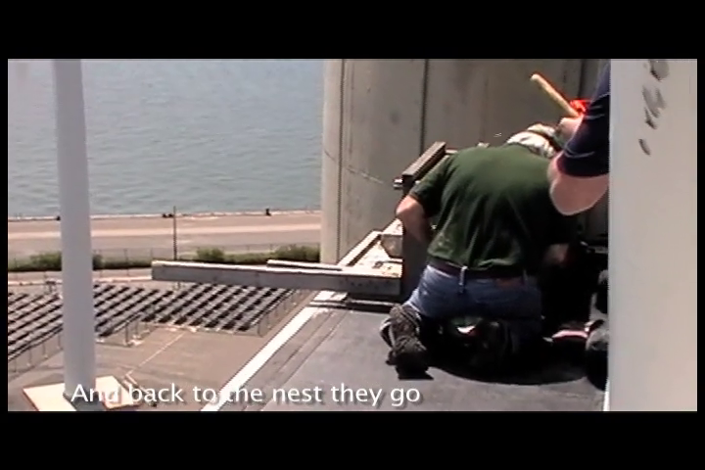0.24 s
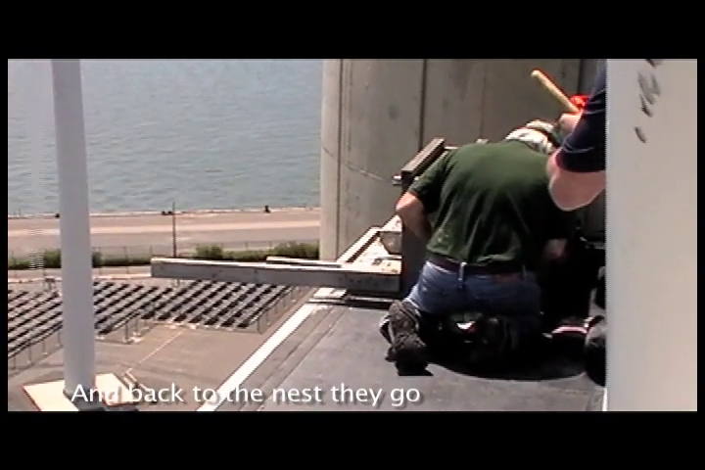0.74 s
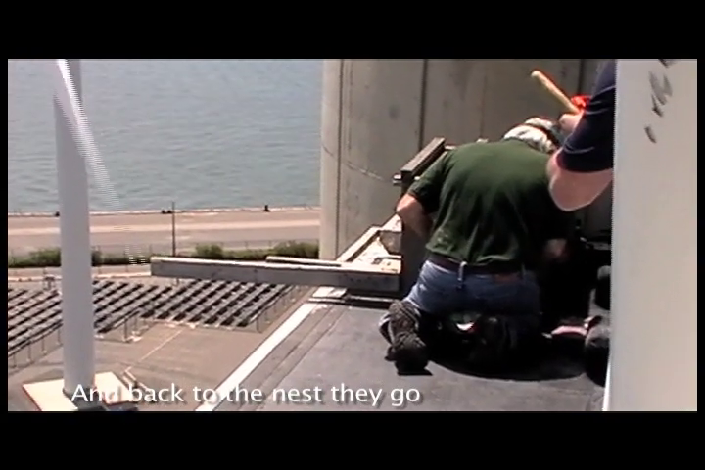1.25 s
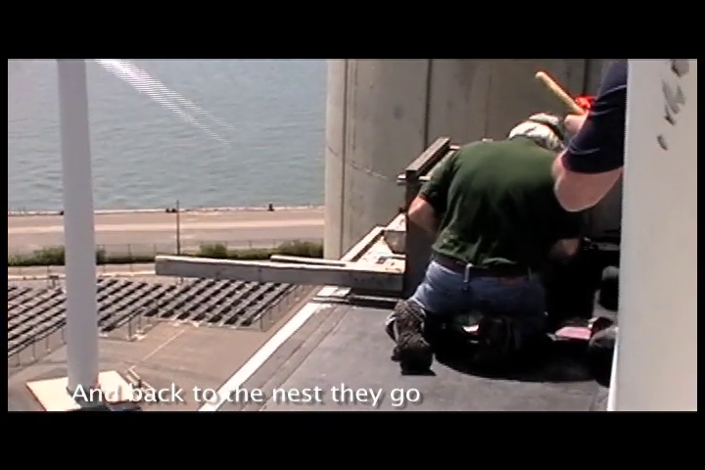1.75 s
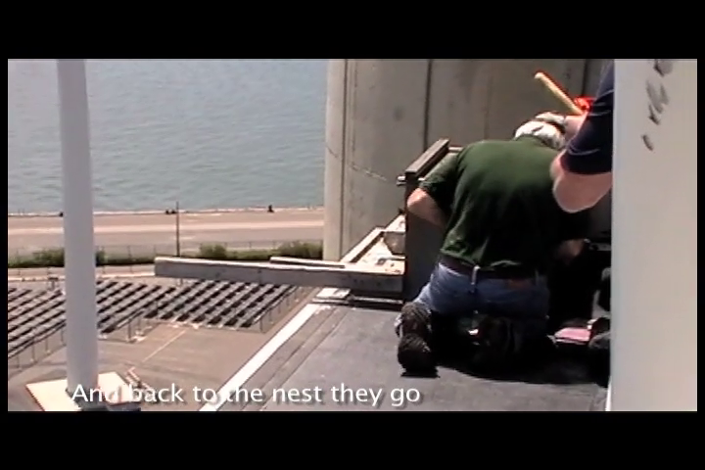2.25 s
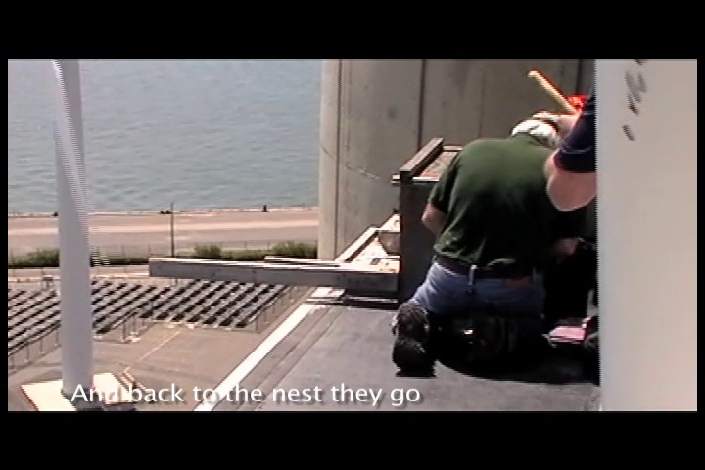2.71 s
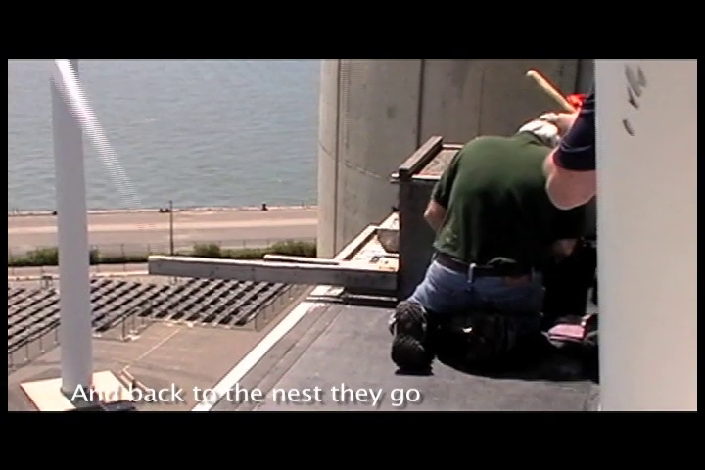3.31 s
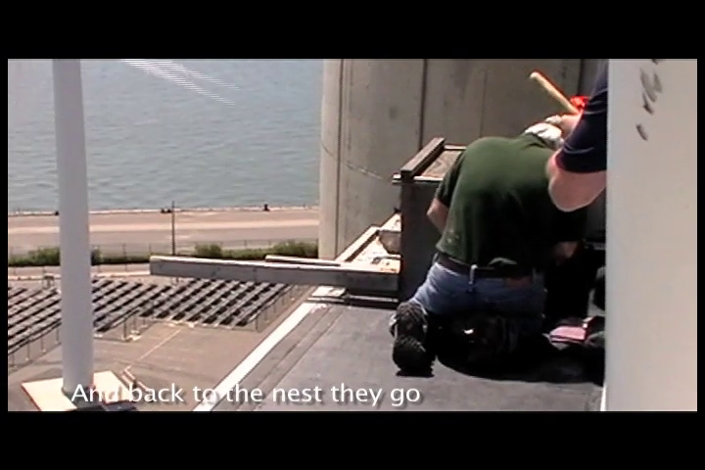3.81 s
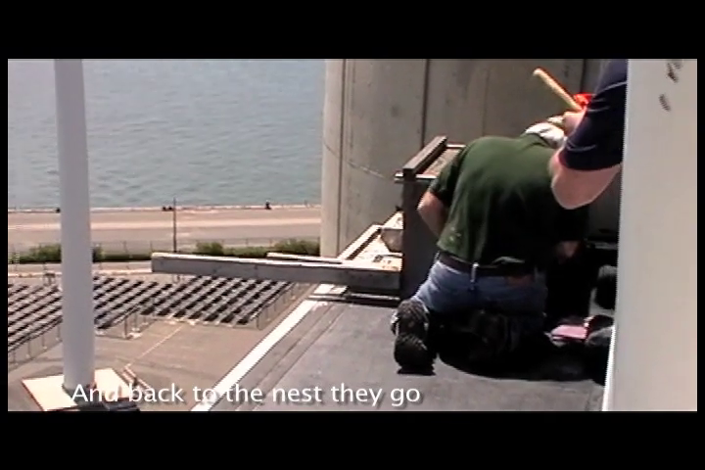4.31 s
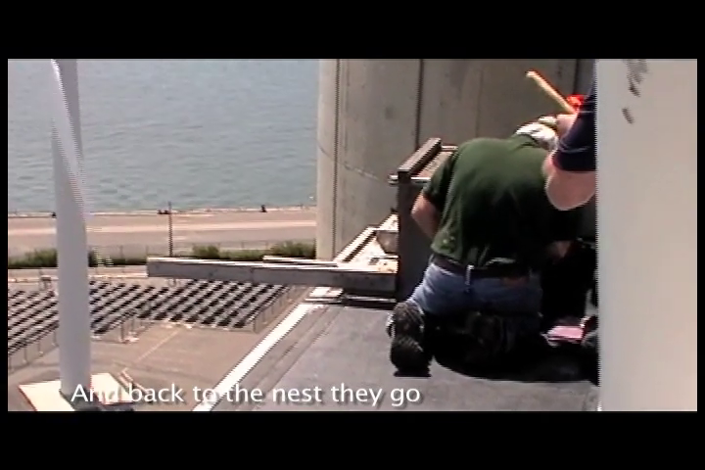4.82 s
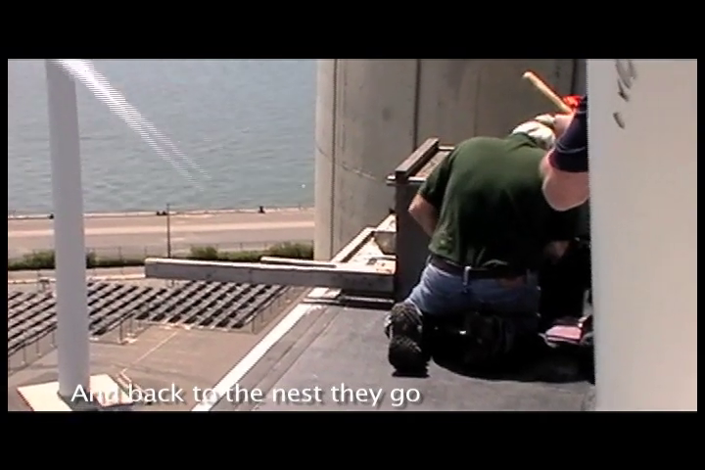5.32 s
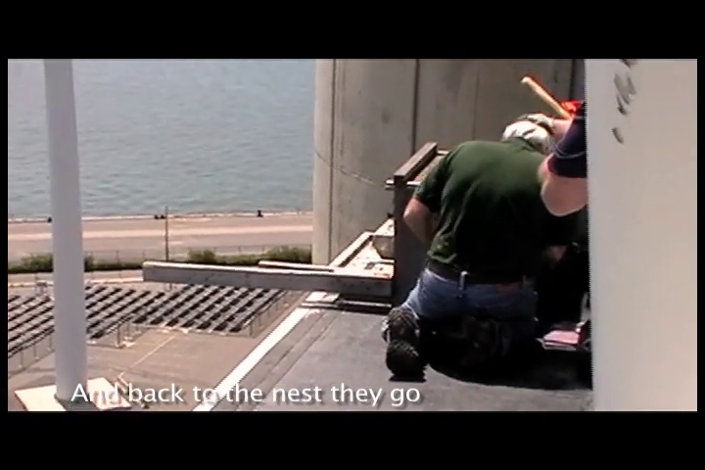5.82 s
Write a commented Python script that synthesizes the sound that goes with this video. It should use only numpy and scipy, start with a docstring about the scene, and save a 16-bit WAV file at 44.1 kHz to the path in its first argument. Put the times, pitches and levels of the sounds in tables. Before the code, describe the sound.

A falcon scolds in rapid, harsh kaks while a second squawks and wails, with wind rumbling on the microphone.

```python
"""From the first moment wind buffets the microphone over a faint town wash, and a peregrine falcon
scolds from a rooftop: even, harsh kaks, membrane pulses ringing through its windpipe. A second
falcon squawks in between, and close concrete walls answer both. Just before the one-second mark
a brief low hoot sounds far off. Then the kaks grow hoarser and the squawks stretch into wails."""
import sys
import numpy as np
from scipy import signal
from scipy.fft import rfft, irfft, next_fast_len
from scipy.io import wavfile
from scipy.ndimage import uniform_filter1d, map_coordinates

SR = 44100
rng = np.random.default_rng(int(sys.argv[2]) if len(sys.argv) > 2 else 0)


def generate_wav(signal):
    """Clip the signal to [-1, 1] and save it as 16-bit WAV at the path in sys.argv[1]."""
    frames = np.transpose(np.atleast_2d(signal))
    scaled = np.clip(frames, -1, 1) * 32767
    pcm = np.round(scaled).astype(np.int16)
    wavfile.write(sys.argv[1], SR, pcm)


N = 266948

# tone of the distant town: freq_hz, level_db
TOWN_SPECTRUM = [(200, -2), (1000, -2), (2500, -16), (5000, -20), (9000, -35.5), (15000, -56)]
# path of the hoot: time_s, pitch_hz, level_db
HOOT_PATH = [(.82, 635, -54), (.845, 623, -29), (.875, 590, -23), (.905, 618, -36), (.935, 700, -32),
             (.965, 746, -37)]
# fader ride of the wind: time_s, level_db
WIND_RIDE = [(0.0, -20.5), (0.13, -12), (0.2, -18.5), (0.64, -14), (0.66, -18), (1.38, -15.5), (1.55, -14),
             (1.63, -15.5), (3.42, -15.5), (3.52, -18.5), (3.89, -12.5), (3.94, -16.5), (4.15, -14),
             (4.41, -17), (4.45, -14), (5.06, -18.5), (5.07, -22.5), (5.26, -16), (5.39, -26),
             (5.44, -12.5), (5.83, -20), (6.05, -21)]
# tone of the wind's low rumble: freq_hz, level_db
RUMBLE_SPECTRUM = [(15, -26), (28, -19), (48, -5.5), (80, 0), (130, 1.5), (190, -1.5), (260, -7.5),
                   (400, -21.5), (800, -49), (4000, -110)]
# tone of the wind's flutter: freq_hz, level_db
FLUTTER_SPECTRUM = [(100, -48), (200, -2), (280, -0.5), (400, -4), (600, -11), (900, -20), (1500, -27.5),
                    (3000, -40), (6000, -66), (12000, -78)]
# hardest hits of wind: time_s, gain_db, puff_relative_db
WIND_HITS = [(.125, -0.5, -9), (.412, -6.5, -9), (0.549, -3.5, -8), (.565, -4, -6), (0.631, -5.5, -23),
             (.695, -9, -5), (.763, -1, -12), (1.529, 3, -10.5), (1.563, -2, -19), (1.829, -5.5, -3.5),
             (1.965, -5, -4.5), (2.015, -7.5, -6.5), (2.043, -10, -15), (2.583, -7, -0.5),
             (2.768, -13, -22), (2.954, -1.5, -10), (3.255, -4, -6.5), (3.586, -11.5, -1), (3.87, -6, -16),
             (4.12, -2, -13), (4.151, -2.5, -22), (4.312, -6, -13), (4.435, -5.5, -7.5), (4.462, -4.5, -10),
             (4.545, -0.5, -10.5), (4.699, -2, -10), (4.73, -2, -9.5), (4.804, -7, -19), (4.875, -4, -7),
             (5.453, -2.5, -11), (5.66, -6.5, -5), (5.849, -7, -26), (5.965, -9, -5.5)]
# decay of the echo off the concrete: freq_hz, t60_s
WALL_DECAY = [(300, 0.22), (2200, 0.16), (6000, 0.14), (12000, 0.089)]
# throat resonances of the second falcon: freq_hz, gain_db
THROAT_EQ = [(600, -41), (1080, -3.5), (1350, -11), (1750, -1.5), (2450, 4.5), (2900, 2), (3500, -6.5),
             (4300, -6), (5100, -11), (6200, -8), (7500, -13), (9500, -19), (12000, -34.5), (15800, -43)]
# the second falcon's cries: start_s, length_s, top_pitch_hz, top_at_share, pitch_fall_share,
# level_db, accent_at_share, roughness_share, brightness_db
CRY_CUES = [(0, 0.058, 1467, 0.33, 0.23, -21, 0.01, 0.39, 3.5),
            (0.271, 0.049, 1214, 0.1, 0.1, -27, 0.15, 0.7, 1),
            (0.553, 0.052, 1450, 0.18, 0.26, -26.5, 0.5, 0.24, 12.5),
            (0.917, 0.052, 1286, 0.4, 0.041, -27.5, 0.2, .8, 5),
            (0.996, 0.055, 1294, 0.39, 0.062, -27.5, 0.32, 0.4, 8.5),
            (1.348, .075, 1514, 0.17, .085, -25, 0.2, 0.2, 2.5),
            (1.466, 0.055, 1403, 0.38, 0.072, -24.5, 0.54, .55, 3),
            (1.774, 0.056, 1430, .55, 0.016, -20, 0.37, 0.18, 1.5),
            (1.847, 0.081, 1413, 0.3, 0.031, -25, .38, 0.28, 0.5),
            (2.115, 0.077, 1365, 0, 0.053, -25, 0.36, 0.45, -3),
            (2.203, 0.074, 1267, 0, 0.068, -24, 0.37, 0.37, -2),
            (2.508, 0.089, 1360, 0.66, 0.043, -25.5, 0.58, 0.38, -3),
            (2.609, .11, 1335, 0, 0.12, -24, 0.38, 0.28, -1),
            (2.91, .13, 1328, 0.4, 0.0084, -25, 0.51, 0.2, -7.5),
            (3.084, .072, 1247, 0, 0.043, -24, 0.52, 0.36, -4),
            (3.339, 0.097, 1318, 0.6, .01, -37.5, .4, 0.42, -5),
            (3.46, 0.2, 1285, 0.08, 0.12, -22, 0.69, 0.36, 1),
            (3.992, 0.19, 1226, .18, 0.067, -24, 0.33, 0.14, -1),
            (4.487, 0.12, 1230, 0.33, 0.054, -35, 0.63, 0.28, -4),
            (4.725, 0.091, 1133, 0.67, .01, -28, 0.62, 0.03, 0),
            (5.113, 0.11, 1116, .05, 0.079, -27, 0.44, 0.33, 2),
            (5.251, .13, 1157, 0.8, .02, -20, 0.53, 0.12, -3),
            (5.608, 0.085, 1304, .35, 0.043, -34, 0.4, 0.3, -6),
            (5.729, 0.21, 1198, 0.1, 0.07, -21.5, 0.83, 0.31, 0.5)]
# windpipe resonances of the scolding falcon: centre_hz, width_hz, gain_db
WINDPIPE_RESONANCES = [(1090, 100, -15), (1860, 380, -6), (2124, 180, 2.5), (2398, 190, 2.5),
                       (2800, 153, 3), (3364, 121, 0.5), (3933, 190, -4), (4360, 170, -22.5),
                       (4396, 144, -9.5), (4900, 110, -15), (5520, 550, -16), (6180, 370, -15.5),
                       (6820, 250, -20.5), (7400, 560, -28.5), (8300, 400, -17), (9030, 370, -22),
                       (10200, 870, -24), (11550, 900, -35), (13200, 2500, -43)]
# the scolding falcon's kaks: end_s, top_pitch_hz, level_db, brightness_db, roughness_share, length_ratio
KAK_CUES = [(0.238, 1120, -18.5, 2.5, .31, 0.93), (.475, 1120, -17.5, 1.3, 0.18, 0.97),
            (.693, 1101, -20, 2.5, 0.25, 0.93), (.925, 1117, -18.5, -1.5, 0.44, 0.92),
            (1.149, 1108, -18.5, 1, 0.31, 0.86), (1.364, 1120, -17, 2.5, 0.17, 0.86),
            (1.568, 1100, -21, -0.5, 0.4, 1.0), (1.777, 1107, -20, 2, 0.37, 0.82),
            (1.999, 1094, -22, 1.5, 0.3, 1), (2.218, 1098, -20.5, 2, 0.32, 0.85),
            (2.437, 1100, -18, 1.5, 0.24, 0.86), (2.655, 1108, -21, 3, .55, 0.95),
            (2.888, 1091, -19.5, 0, 0.43, 0.91), (3.105, 1095, -20, 2.5, 0.45, 0.99),
            (3.333, 1084, -20.5, 0.5, 0.51, 1.0), (3.545, 1070, -17.5, 0, 0.62, 0.98),
            (3.777, 1073, -18.5, -1.5, 0.53, 1.0), (4.008, 1081, -22, -2, 0.73, 0.99),
            (4.228, 1096, -21, -0.5, 0.49, 0.98), (4.452, 1083, -19, -1.5, 0.61, 0.92),
            (4.683, 1079, -21, -1, .51, 0.97), (4.912, 1097, -21.5, -0.5, 0.49, 0.97),
            (5.127, 1069, -18.5, -3, 0.7, 0.92), (5.357, 1074, -16, -2, 0.47, 1.0),
            (5.591, 1074, -18, -1.5, 0.45, 0.99), (5.805, 1077, -17.5, -2.5, 0.63, 0.99),
            (6.012, 1113, -17, -2, 0.63, 0.95)]


def amp(db):
    """Decibels to gain."""
    return 10 ** (np.asarray(db) / 20)


def unit(x):
    """Scale to rms 1."""
    return x / np.sqrt(np.mean(x ** 2) + 1e-20)


def along(points, hz):
    """Read (freq_hz, value) points on a log frequency axis."""
    freqs, values = np.transpose(points)
    return np.interp(np.log(hz + 1), np.log(freqs), values)


def curves(rows, t):
    """Each column after the time, read at the times t."""
    times, *columns = np.transpose(rows)
    return [np.interp(t, times, column) for column in columns]


def wobble(rate, size):
    """A smooth random curve, rate knots a second."""
    at = np.arange(size) * rate / SR
    return map_coordinates(rng.standard_normal(4096), [at], mode='wrap')


def colour(x, points):
    """EQ x with (freq_hz, gain_db) points and scale to rms 1."""
    size = next_fast_len(len(x) + 4096)
    gain = amp(along(points, np.fft.rfftfreq(size, 1 / SR)))
    return unit(irfft(rfft(x, size) * gain, size)[:len(x)])


def town():
    """A steady, dull bed of noise from the distant town."""
    return amp(-40) * colour(rng.standard_normal(N), TOWN_SPECTRUM)


def hoot():
    """A faint hollow tone that sags and lifts again."""
    t = np.arange(N) / SR
    hz, db = curves(HOOT_PATH, t)
    sounding = (t > HOOT_PATH[0][0]) & (t < HOOT_PATH[-1][0])
    return sounding * amp(db) * np.sqrt(2) * np.sin(2 * np.pi * np.cumsum(hz) / SR)


def wind():
    """Eddies on the microphone: a swelling rumble under quick bursts of flutter."""
    ride_db, = curves(WIND_RIDE, np.arange(N) / SR)
    eddies_db = 1.42 * wobble(26, N)
    rumble = colour(rng.standard_normal(N), RUMBLE_SPECTRUM)
    # level the rumble so that gusts and eddies set its slow swells
    rumble /= np.sqrt(np.abs(uniform_filter1d(rumble ** 2, size=3000)) + .047)
    rumble = unit(rumble * amp(eddies_db))
    flutter = colour(rng.standard_normal(N), FLUTTER_SPECTRUM)
    flutter = unit(flutter * amp(1.2 * eddies_db + 3.2 * wobble(70, N)))
    return amp(ride_db) * (amp(-.5) * rumble + amp(-7) * flutter)


def buffets():
    """Hard eddies shove the diaphragm: each a low thump with a puff of flutter."""
    out = np.zeros(N)
    t = np.arange(SR // 16) / SR
    for time_s, db, puff_db in WIND_HITS:
        eddy_hz = 160 * np.exp(.237 * rng.standard_normal())
        thump = np.sin(2 * np.pi * eddy_hz * t) * np.exp(-t / .008)
        puff = amp(puff_db) * colour(rng.standard_normal(len(t)), FLUTTER_SPECTRUM) * np.exp(-t / .0072)
        attack = 1 - np.exp(-t / .0007)
        out[round((time_s - .002) * SR):][:len(t)] += amp(db) * (thump + puff) * attack
    return out


def walls(x):
    """Near concrete throws back a short diffuse tail whose treble dies first."""
    hz, t, noise = signal.stft(rng.standard_normal(SR // 2), SR, nperseg=256)
    decay = amp(-60 * t / along(WALL_DECAY, hz)[:, None])
    tail = signal.istft(noise * decay, SR, nperseg=256)[1]
    return signal.fftconvolve(x, amp(-9) * tail / np.linalg.norm(tail))[:N]


def syrinx(pitch, rough, jitter, rasp, hiss, noisy_hz):
    """Membrane pulses; when rough they stumble, beat in groups of about four and chop air into noise."""
    size = len(pitch)
    rough = np.clip(rough, 0, 1)
    phase = 2 * np.pi * np.cumsum(pitch * (1 + jitter * rough * wobble(452.9, size))) / SR
    pulses = unit(sum(np.cos(k * phase) for k in range(1, 15)))
    # the uneven groups put side tones between the harmonics
    grouping = phase / 4 + 2 * np.pi * np.cumsum(14 * wobble(80, size)) / SR
    beat = np.cos(grouping) + .55 * np.cos(2 * grouping + rng.uniform(0, 2 * np.pi))
    pulses = unit(pulses * (1 + rasp * rough * (beat + .55 * wobble(599.2, size))))
    air = unit(rng.standard_normal(size) * (1 + .38 * np.cos(phase)) * (1 + .05 * np.cos(grouping)))
    hz, at, (pulses, air) = signal.stft([pulses, air], SR, nperseg=256)
    # the high overtones break up into noise first
    blur = np.interp(at * SR, np.arange(size), rough) ** 1.5 * (hiss + (hz[:, None] / noisy_hz) ** 2)
    clean = np.exp(-blur)
    return signal.istft(np.sqrt(clean) * pulses + np.sqrt(1 - clean) * air, nperseg=256)[1][:size]


def wailing_falcon():
    """Squawks lengthen into quavering wails; each arches in pitch and is clearest at its accent."""
    attack_s, release_s, accent_s = .014, .02, .029
    out = np.zeros(N + SR)
    for start, length, top_hz, top_at, fall, db, accent_at, accent_rough, bright_db in CRY_CUES:
        t = np.arange(int(length * SR)) / SR
        top_s = np.clip(top_at, .01, .95) * length
        rising = np.maximum(1 - t / top_s, 0)
        falling = np.maximum(t - top_s, 0) / (length - top_s)
        pitch = top_hz * (1 - 1.1 * top_s * rising ** 1.4 - fall * falling ** 1.5)
        off_accent = 1 - np.exp(-((t - accent_at * length) / accent_s) ** 2)
        rough = accent_rough + .217 * off_accent
        quaver = 1 + .05 * rough * wobble(140, len(t))
        source = syrinx(pitch * quaver, rough, jitter=.026, rasp=1.3, hiss=.7, noisy_hz=4800)
        voice = colour(colour(source, THROAT_EQ), [(2700, 0), (4200, bright_db)])
        # the throat is tuned to the second harmonic
        voice = colour(voice, [(1.6 * pitch.mean(), 0), (2 * pitch.mean(), 3), (2.4 * pitch.mean(), 0)])
        catches = amp(5 * rough * wobble(100, len(t)))
        gate = np.minimum(t / attack_s, 1) * np.minimum((length - t) / release_s, 1)
        out[round(start * SR):][:len(t)] += amp(db - 5 * off_accent) * gate * unit(voice * catches)
    return out[:N]


def windpipe(source, beak_ratio, beak_hz=6000):
    """Narrow tube resonances; those below about beak_hz rise as the beak opens."""
    hz, at, spectrum = signal.stft(source, SR, nperseg=640, noverlap=480)
    reach = 1 / (1 + (hz[:, None] / beak_hz) ** 4)
    warped_hz = hz[:, None] / np.interp(at * SR, np.arange(len(source)), beak_ratio) ** reach
    power = sum(amp(db) ** 2 / (1 + 2 * ((warped_hz - centre) / width) ** 2) ** 2
                for centre, width, db in WINDPIPE_RESONANCES)
    return signal.istft(spectrum * np.sqrt(power), nperseg=640, noverlap=480)[1][:len(source)]


def scolding_falcon():
    """Each kak swells out of a rasp, clears at the top of its pitch arch and stops short."""
    # envelope at length ratio 1; times count back from the kak's end
    onset_s, crest_s, cut_s = .128, .046, .012
    attack_db_per_s, swell_db_per_s, release_db_per_s = 1100, 194, 1200
    out = np.zeros(N + SR)
    t = np.arange(int(-.19 * SR), int(.03 * SR)) / SR
    for end_s, top_hz, db, bright_db, rough, length_ratio in KAK_CUES:
        to_end = -t / length_ratio
        to_crest = np.maximum(to_end - crest_s, 0)
        envelope_db = -(attack_db_per_s * np.maximum(to_end - onset_s, 0)
                        + swell_db_per_s * to_crest
                        + release_db_per_s * np.maximum(cut_s - to_end, 0))
        onset = np.minimum(to_crest / (onset_s - crest_s), 1.3)  # falls to 0 at the crest
        closing = np.clip(1 - to_end / crest_s, 0, 1.3)
        # hoarse kaks hold their pitch better, clear ones drop
        drop = .106 * max(1 - .95 * rough, .13)
        pitch = top_hz * (1 - .14 * onset ** 1.4 - drop * closing ** 1.585)
        source = syrinx(pitch, rough + .68 * onset, jitter=.02, rasp=1.9, hiss=.8, noisy_hz=5000)
        # the beak starts half shut, opens, then closes a little on the note
        beak_ratio = 1 - .14 * onset ** 2.15 - .026 * closing ** 2
        # brightness lifts the third harmonic and all above it
        tilt = [(2200, 0), (2700, .38 * bright_db - 2.5), (3250, 1.3 * bright_db - .5),
                (5500, .81 * bright_db), (9000, bright_db + 2), (13000, .61 * bright_db + 1)]
        voice = colour(windpipe(source, beak_ratio), tilt)
        kak = voice * amp(db + envelope_db) * signal.windows.tukey(len(t), .2)
        out[max(0, round((end_s + t[0]) * SR)):][:len(t)] += kak
    return out[:N]


def scene():
    """Both falcons and their echo over town, hoot and wind, mixed in mono."""
    birds = scolding_falcon() + wailing_falcon()
    mono = town() + hoot() + walls(birds) + wind() + buffets() + birds
    return np.array([mono, mono])


def record(dry):
    """A soft clip rounds off the highest peaks, then a brick-wall low-pass trims the top."""
    cutoff_hz = 15750
    rounded = dry / (1 + np.abs(dry) ** 8) ** (1 / 8)
    size = next_fast_len(N + 4096)
    passband = np.fft.rfftfreq(size, 1 / SR) < cutoff_hz
    return irfft(rfft(rounded, size) * passband, size)[:, :N]


dry = scene()
out = record(dry)
generate_wav(out)
```